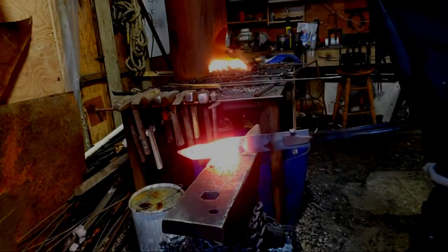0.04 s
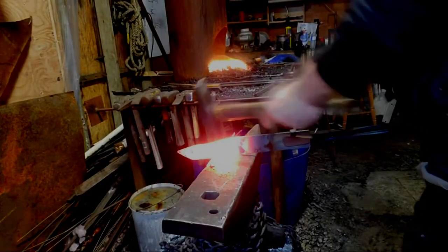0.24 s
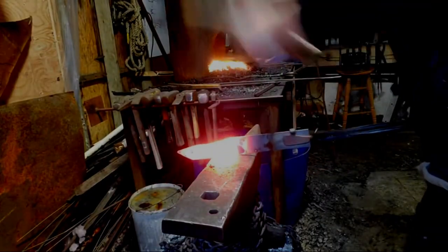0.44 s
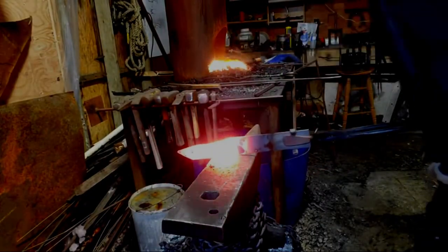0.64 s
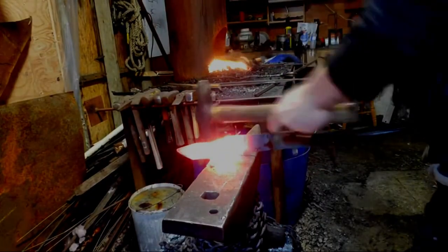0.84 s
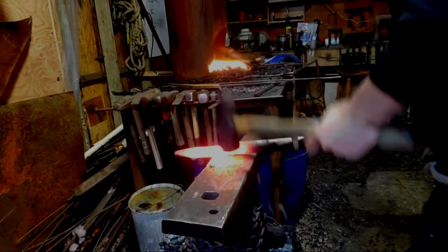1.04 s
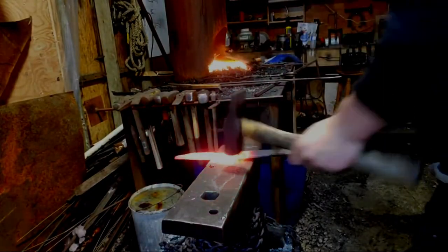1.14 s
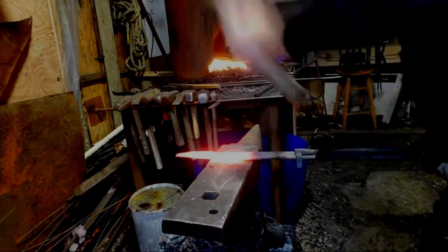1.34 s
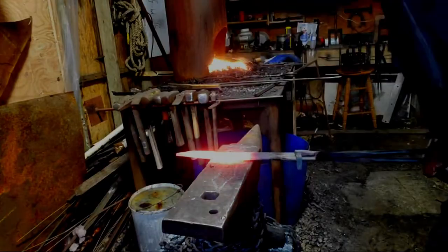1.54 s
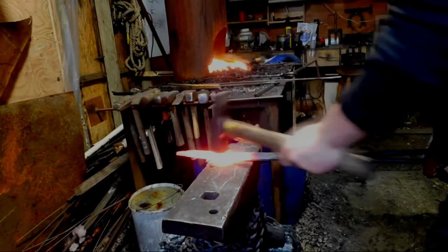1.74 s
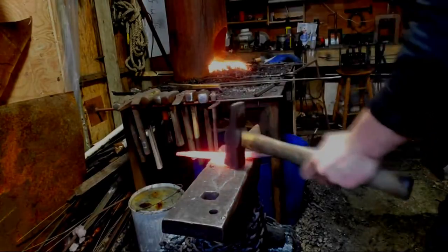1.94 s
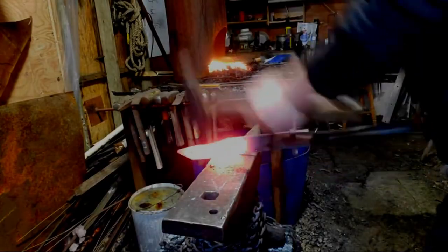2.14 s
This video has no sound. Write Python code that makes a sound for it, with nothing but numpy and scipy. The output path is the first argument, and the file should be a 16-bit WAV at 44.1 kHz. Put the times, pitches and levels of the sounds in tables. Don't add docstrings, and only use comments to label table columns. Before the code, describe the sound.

A hand hammer strikes hot steel on an anvil, dull heavy blows with a bright ringing tap between

```python
import sys
import numpy as np
from scipy import signal
from scipy.fft import rfft, irfft
from scipy.io import wavfile
from scipy.ndimage import map_coordinates

SR = 44100
rng = np.random.default_rng(int(sys.argv[2]) if len(sys.argv) > 2 else 0)


def master_out(mix):
    frames = np.transpose(np.atleast_2d(mix))
    ceiling = np.clip(frames, -1, 1)
    pcm = np.round(ceiling * 32767).astype(np.int16)
    wavfile.write(sys.argv[1], SR, pcm)


def boost_factor(decibels):
    exponent = np.asarray(decibels, float) / 20
    return 10 ** exponent


N = 97020
LIFE = 36000
RING_RISE_S, PING_DB = .0006, 5.5

# f/Hz, level/dB per Hz
LIGHT_WASH = [(180, -4), (300, -7), (961, -14), (1120, -4), (1390, -11.5), (3830, -18), (4750, -30.5),
              (8940, -42.5), (16000, -62)]
# f/Hz, level/dB per Hz
LIGHT_CRACK = [(400, -9), (1200, -0.5), (4200, -0.5), (5500, -32), (16000, -45.5)]


def unit(x):
    return x / np.sqrt(np.mean(x ** 2) + 1e-20)


def along(points, hz):
    f, v = np.transpose(points)
    return np.interp(np.log(hz + 1), np.log(f + 1), v)


def wobble(rate, size):
    knots = rng.standard_normal(int(size * rate / SR) + 4)
    return map_coordinates(knots, [np.arange(size) * rate / SR])


def noise(spectrum, size, tilt_db=0):
    hz = np.fft.rfftfreq(size, 1 / SR)
    gain = boost_factor(along(spectrum, hz) + tilt_db * np.log2(hz / 1000 + 1e-3))
    return unit(irfft(rfft(rng.standard_normal(size)) * gain, size))


def blows():
    # t/s, strength/dB, crack/dB, thud/dB, brightness/dB per octave
    heavy_hits = [
        (.2228, -3.5, 3, -3.5, 1.5),
        (.839, -4, 2.5, -2.5, 1),
        (1.719, -6.5, 4.5, -2.5, 3.5),
    ]
    # f/Hz, level/dB, t60/s
    bar_rings = [
        [(2062, -12, .17), (4118, -12, .15), (5782, -3, .22), (6562, -5, .22), (8705, -1, .22),
         (10070, -5, .27), (10780, -1, .17)],
        [(1890, -4, .33), (2008, 6, .37), (3424, 2, .12), (5778, 0, .2), (6406, -15, .3), (8629, -11, .2),
         (10064, 2, .33), (11490, -12, .23)],
        [(1906, 0, .4), (3795, -12, .25), (6659, -11, .15), (8619, -10, .2), (9448, -8, .12), (11350, -10, .19)],
    ]
    # f/Hz, level/dB per Hz
    wash_colour = [(90, -34.5), (220, 0.5), (620, -3), (1050, -4), (1750, -18), (6000, -25.5),
                   (10000, -19.5), (16000, -34)]
    # f/Hz, level/dB per Hz
    crack_colour = [(300, -11.5), (2000, -2), (7500, -7), (10000, 4), (16000, -8.5)]
    mix_db = (-9, -24.5, -12.5, -4.5)
    return strikes(heavy_hits, bar_rings, wash_colour, crack_colour, mix_db, rise_s=.015, ping_db=-4.5)


def taps():
    # t/s, strength/dB, crack/dB, thud/dB, brightness/dB per octave
    hard_hits = [
        (1.1047, -9, 4, -16, 1.5),
    ]
    # f/Hz, level/dB, t60/s
    anvil = [(1104, -4, .27), (1890, -12, .4), (2056, -2, .3), (2643, -10, .28), (3430, -8, .3),
             (3792, -8, .23), (4872, -7, .2), (5380, -11, .28), (5782, -10, .2), (6582, 0, .26),
             (8646, -14, .24), (9491, -12, .22), (10070, -16, .27), (10760, -18, .14)]
    # f/Hz, level/dB per Hz
    wash_colour = [(88, -31.5), (150, -4), (1100, -5.5), (1390, -10.5), (2060, -5), (6140, -11),
                   (6640, -4.5), (7320, -18.5), (16000, -32.5)]
    # f/Hz, level/dB per Hz
    crack_colour = [(300, -14), (1200, 1.5), (4000, -2), (7000, -16), (16000, -23)]
    mix_db = (-9.5, -16.5, -7, -3)
    return strikes(hard_hits, [anvil], wash_colour, crack_colour, mix_db, RING_RISE_S, PING_DB)


def bounces():
    # t/s, strength/dB, crack/dB, thud/dB, brightness/dB per octave
    soft_hits = [
        (1.8826, -15.5, 6, -23.5, 2),
        (1.9312, -17.5, 3, -18.5, -0.1),
    ]
    # f/Hz, level/dB, t60/s
    anvil = [
        [(488, -13, 0.61), (1150, 0.5, 0.057), (1540, 5, 0.014), (2213, -2, 0.11), (2600, -13.5, 0.033),
         (3760, -2.5, 0.027), (4370, -13, 0.043), (6575, -31, 0.28), (8580, -25.5, 0.24)],
        [(1112, -0.5, 0.31), (2004, -12.5, 0.26), (2104, -4, 0.097), (2480, -1, 0.031), (3456, -15, 0.16),
         (3920, -2.5, 0.036), (6575, -30, .33), (8690, -26, 0.14)],
    ]
    mix_db = (-13.5, -12.5, -6, -14.5)
    return strikes(soft_hits, anvil, LIGHT_WASH, LIGHT_CRACK, mix_db, RING_RISE_S, PING_DB)


def scuffs():
    # t/s, strength/dB, crack/dB, thud/dB, brightness/dB per octave
    shifts = [
        (1.833, -28.5, 1, -12, 4),
        (2.079, -29.5, -3, -14.5, -1),
        (2.102, -46.5, -8.5, -21, 2),
    ]
    mix_db = (-17.5, -8, -8, -6)
    no_rings = [[]] * len(shifts)
    return strikes(shifts, no_rings, LIGHT_WASH, LIGHT_CRACK, mix_db, RING_RISE_S, PING_DB)


def strikes(events, rings, wash_colour, crack_colour, mix_db, rise_s, ping_db):
    out = np.zeros(N + LIFE)
    t = np.arange(LIFE) / SR
    wash_db, ring_db, stump_db, snap_db = mix_db
    for (s, db, crack_db, thud_db, tilt_db), modes in zip(events, rings):
        rough_wash_db = wash_db + .8 * wobble(120, LIFE)
        hit = boost_factor(rough_wash_db) * wash(wash_colour, t, tilt_db)
        hit += boost_factor(ring_db) * ring(modes, t, rise_s, ping_db)
        hit += boost_factor(stump_db + thud_db) * thud(t)
        hit += boost_factor(snap_db + crack_db) * crack(crack_colour, t)
        smear = lead()
        start = round(s * SR)
        out[start:][:LIFE] += boost_factor(db) * hit
        out[start - len(smear):start] += boost_factor(db) * smear
    return out[:N]


def crack(colour, t):
    rise_s, t60_s = .0003, .007
    return boost_factor(-60 * t / t60_s) * (1 - np.exp(-t / rise_s)) * noise(colour, len(t))


def ring(modes, t, rise_s, ping_db, turn=-1):
    ping_s, bend_s = .033, .87
    unsteady = .25
    total = 0
    for k, (hz, db, t60) in enumerate(modes):
        decay = boost_factor(db - 60 * t * (1 + t / bend_s) / t60)
        waver = 1 + unsteady * wobble(46, len(t))
        total = total + turn ** k * decay * waver * np.sin(2 * np.pi * hz * t)
    return (1 - np.exp(-t / rise_s)) * boost_factor(ping_db * np.exp(-t / ping_s)) * total


def thud(t):
    # f/Hz, level/dB, t60/s
    stump = [(186, -7.5, 0.39), (237, -2, 0.21), (302.5, 7.5, 0.035), (296.3, 3, 0.15), (354, -7, 0.36),
             (405.9, 1, 0.18), (517, -4, 0.2), (819, -5, 0.34), (899, -7, .22), (1049, -8, .2)]
    # f/Hz, level/dB, t60/s
    floor = [(57.4, -2, .7), (72.5, -4.5, 0.62), (102.46, -1, 0.69), (148, -14, 0.85)]
    delay_s = .0009
    wood = ring(stump, (t - delay_s).clip(0), .0008, ping_db=0, turn=1)
    return wood + ring(floor, t, .024, ping_db=0)


def wash(colour, t, tilt_db):
    # f/Hz, t60/s
    shop = [(150, .35), (500, .28), (2000, 0.25), (6000, 0.21), (12000, 0.16)]
    early_db, early_s = -3, .04
    late_db, late_slower = -30.5, 3
    rise_s = .004
    hz, s, z = signal.stft(noise(colour, len(t), tilt_db), SR, nperseg=256)
    hz = hz[:, None]
    fall_db = -60 * s / along(shop, hz)
    roof = boost_factor(late_db + fall_db / late_slower) / (1 + (hz / 700) ** 2)
    tail = signal.istft(z * (boost_factor(fall_db) + roof), SR, nperseg=256)[1][:len(t)]
    return tail * (1 - np.exp(-t / rise_s)) * boost_factor(early_db * np.exp(-t / early_s))


def lead():
    level_db, length_s, top_hz = -31.5, .0072, 7400
    colour = [(700, -40), (1200, 0), (top_hz, 0), (top_hz * 1.1, -25)]
    smear = noise(colour, LIFE)[:round(length_s * SR)]
    swell = np.hanning(2 * len(smear))[:len(smear)] ** .5
    return boost_factor(level_db) * smear * swell


def flakes():
    # t/s, level/dB, t60/s
    showers = [
        (.2228, -50, 0.43),
        (.839, -43, 0.36),
        (1.719, -35, 0.42),
        (1.843, -43.5, 0.11),
        (2.079, -67.5, 0.3),
    ]
    # f/Hz, level/dB per Hz
    patter_colour = [(2000, -45.5), (4000, 0), (8000, -5.5), (10500, -1.5), (15500, -8), (16200, -59)]
    clump_db, rise_s = 1.2, .008
    t = np.arange(N) / SR
    shower = np.zeros(N)
    for s, db, t60 in showers:
        age = (t - s).clip(0)
        shower += boost_factor(db - 60 * age / t60) * (1 - np.exp(-age / rise_s))
    clumps = boost_factor(clump_db * (wobble(60, N) + wobble(400, N)))
    return shower * unit(clumps * noise(patter_colour, N))


def forge():
    # f/Hz, level/dB per Hz
    roar_colour = [(20, -59.5), (40, -12), (75, 2), (110, -7), (220, -16.5), (400, -23), (900, -43.5),
                   (2500, -66.5), (5000, -110)]
    # f/Hz, level/dB per Hz
    hiss_colour = [(900, -36), (1800, 0), (4000, -6.5), (8000, -7.5), (11300, 0.5), (13000, 0),
                   (15600, -5.5), (16200, -93.5)]
    # f/Hz, width/Hz, level/dB
    flue = [(145, 14, 8), (200, 10, 6), (246, 10, 10), (304, 14, 10)]
    roar_db, hiss_db, flutter_db = -47, -83.5, 1.5
    hz = np.fft.rfftfreq(N, 1 / SR)
    hollow = boost_factor(sum(db * np.exp(-((hz - c) / w) ** 2) for c, w, db in flue))
    flutter = boost_factor(flutter_db * (wobble(1, N) + wobble(6.8, N)))
    roar = unit(flutter * irfft(rfft(noise(roar_colour, N)) * hollow, N))
    return boost_factor(roar_db) * roar + boost_factor(hiss_db) * noise(hiss_colour, N)


def scene():
    hammer = blows() + taps() + bounces() + scuffs()
    return (hammer + flakes() + forge())[None]


def low_pass(x):
    return signal.sosfilt(signal.butter(12, 16820, fs=SR, output="sos"), x)


def record(dry):
    low_cut_hz, top_hz, top_width_hz = 33, 16100, 150
    dip_hz, dip_width_hz, dip_db = 7590, 500, -8.5
    hz = np.fft.rfftfreq(N, 1 / SR)
    bass_cut = (1j * hz / (low_cut_hz + 1j * hz)) ** 2
    top_cut = .5 - .5 * np.tanh((hz - top_hz) / top_width_hz)
    dip = boost_factor(dip_db * np.exp(-((hz - dip_hz) / dip_width_hz) ** 2))
    heard = irfft(rfft(dry) * bass_cut * top_cut * dip, N)
    return low_pass(heard)


dry = scene()
out = record(dry)
master_out(out)
```